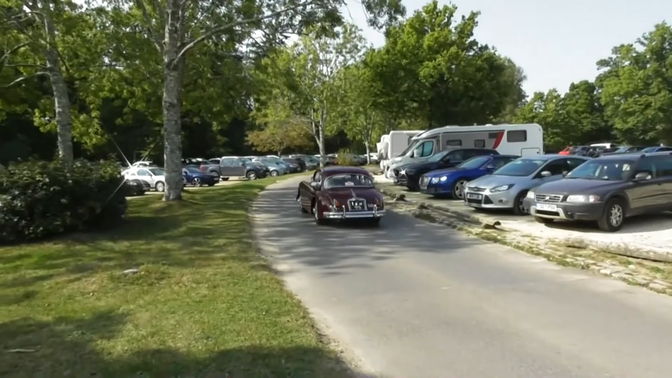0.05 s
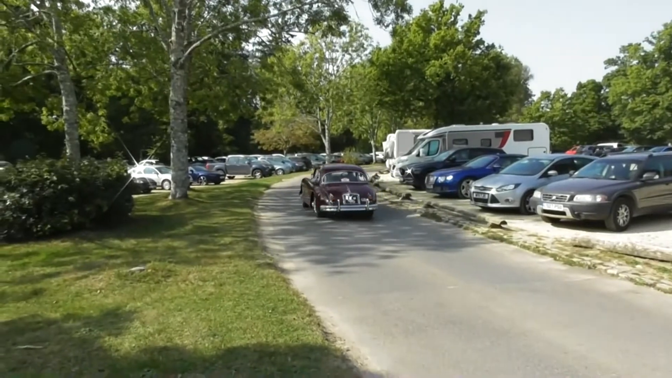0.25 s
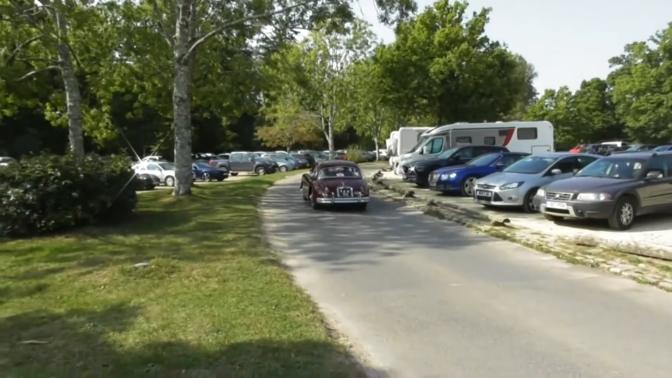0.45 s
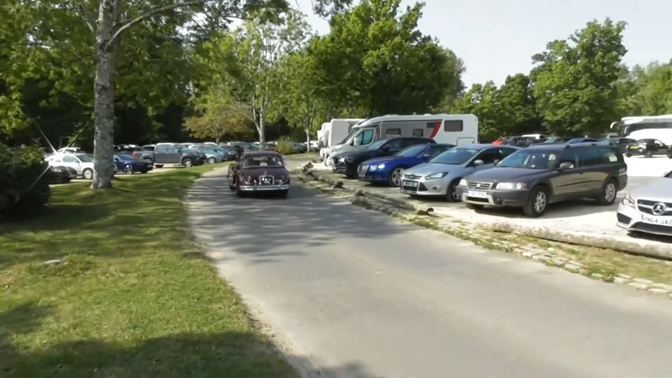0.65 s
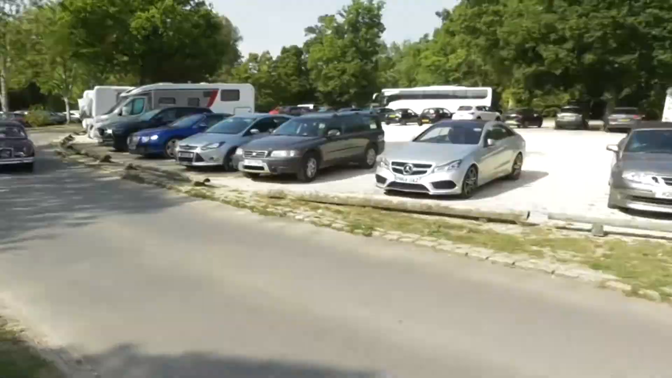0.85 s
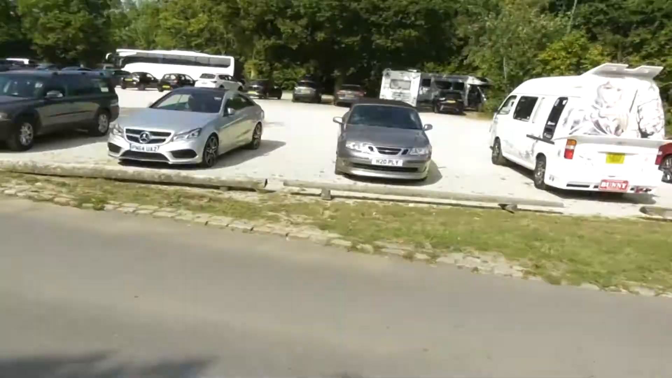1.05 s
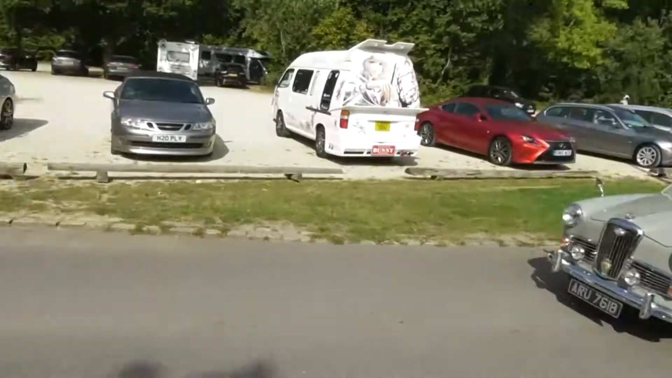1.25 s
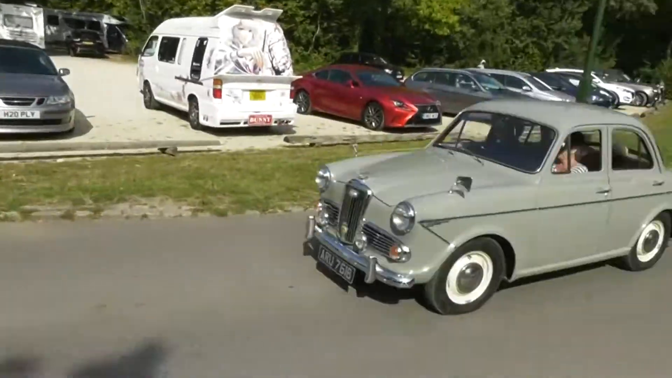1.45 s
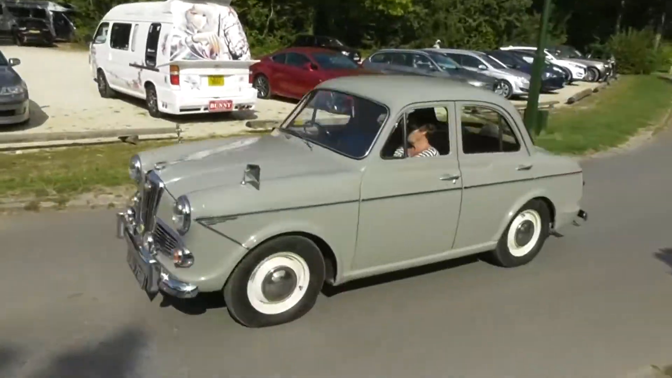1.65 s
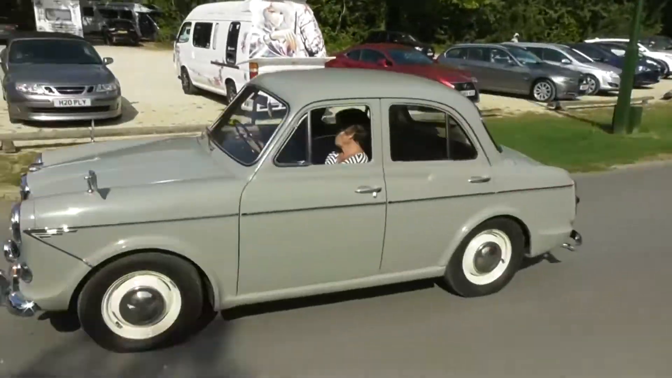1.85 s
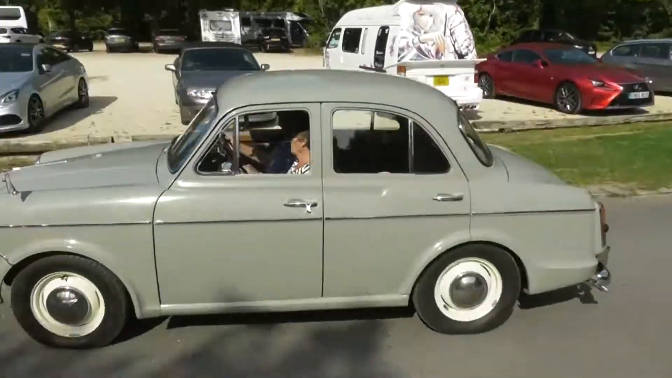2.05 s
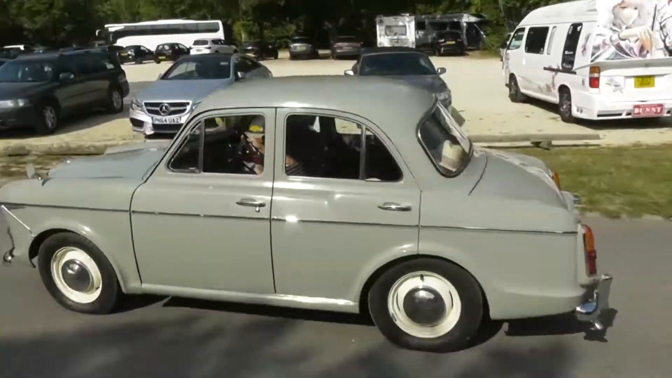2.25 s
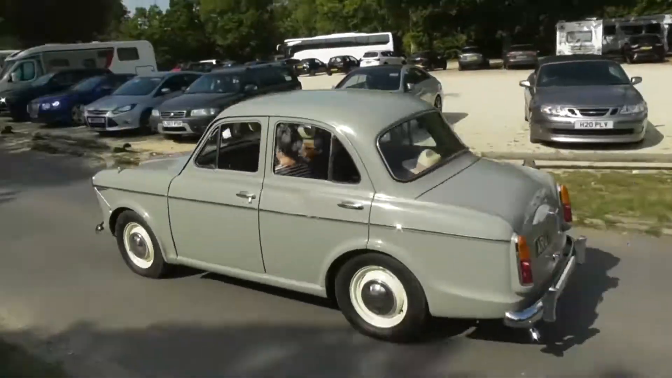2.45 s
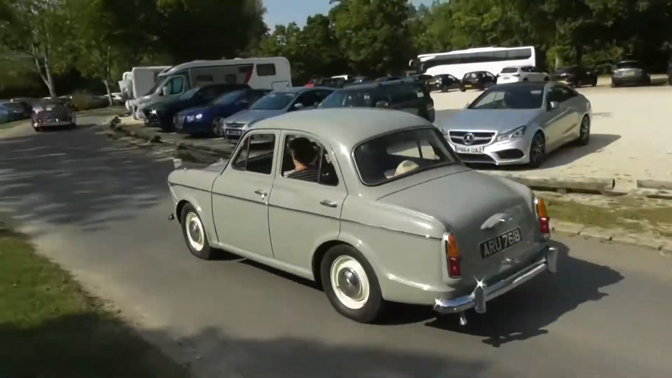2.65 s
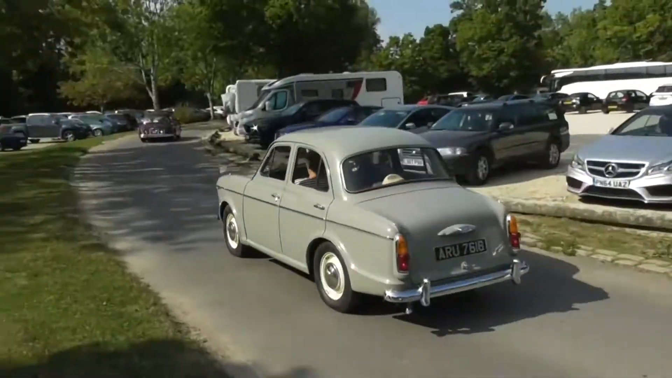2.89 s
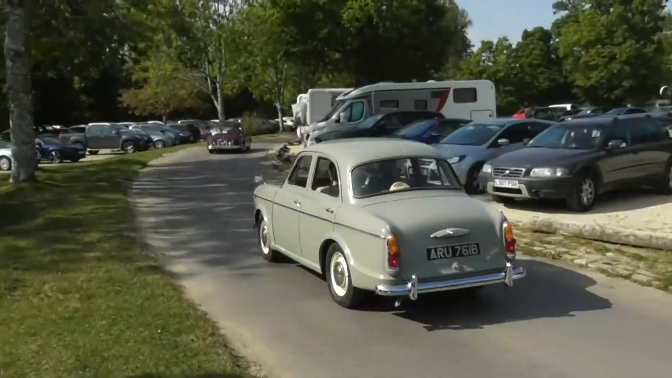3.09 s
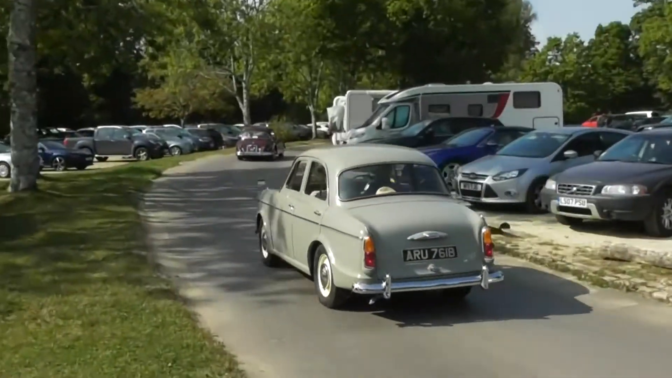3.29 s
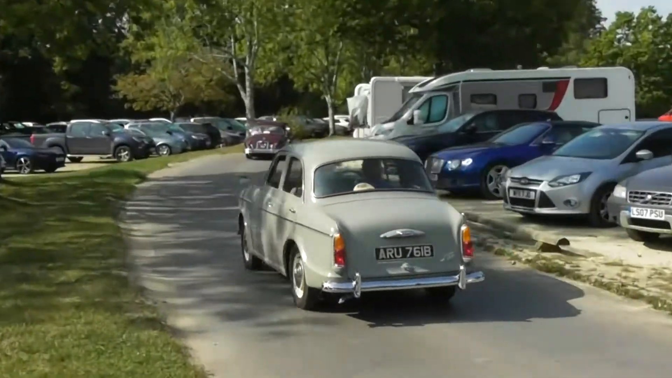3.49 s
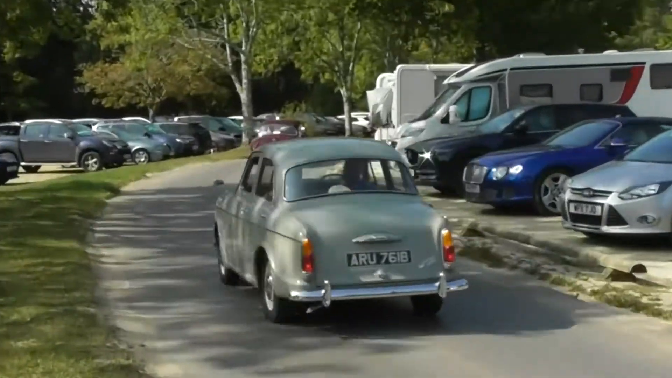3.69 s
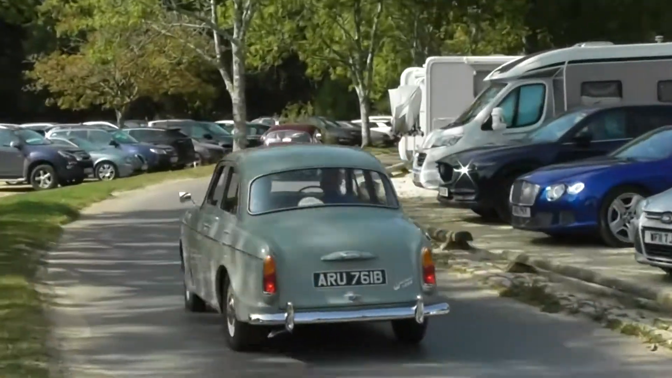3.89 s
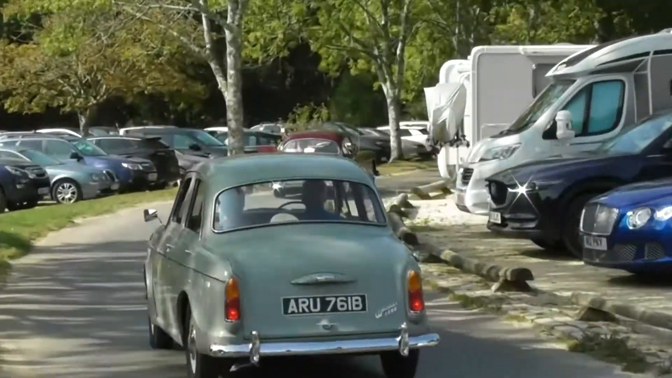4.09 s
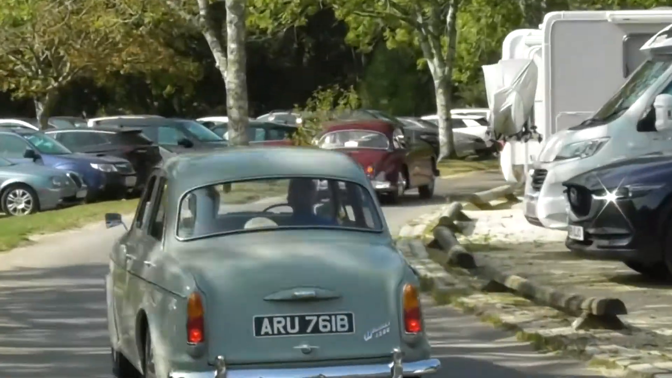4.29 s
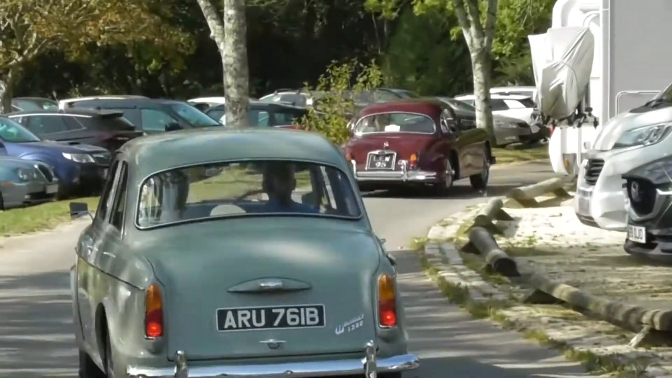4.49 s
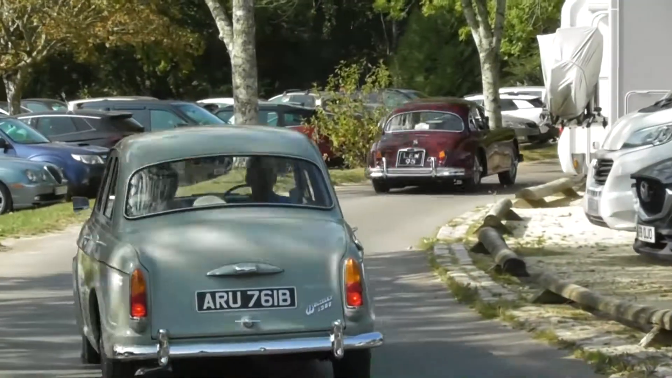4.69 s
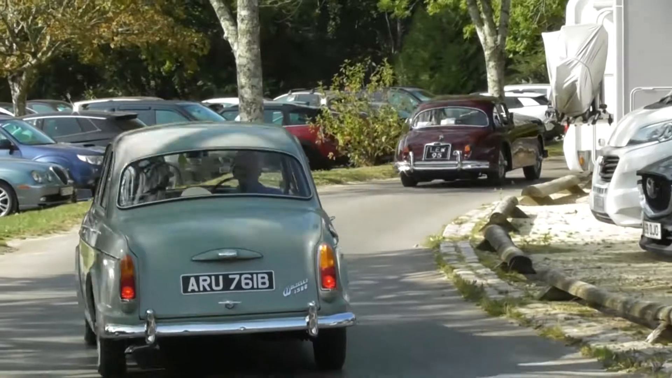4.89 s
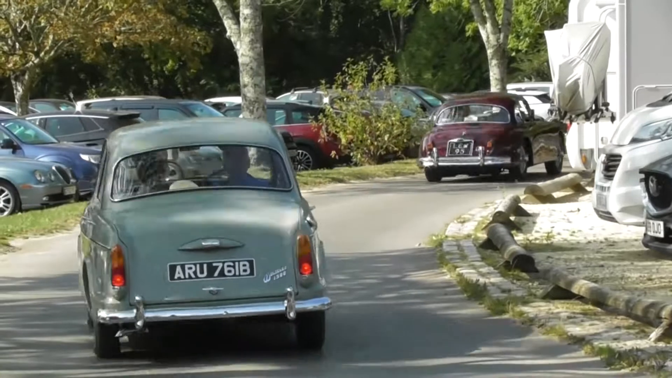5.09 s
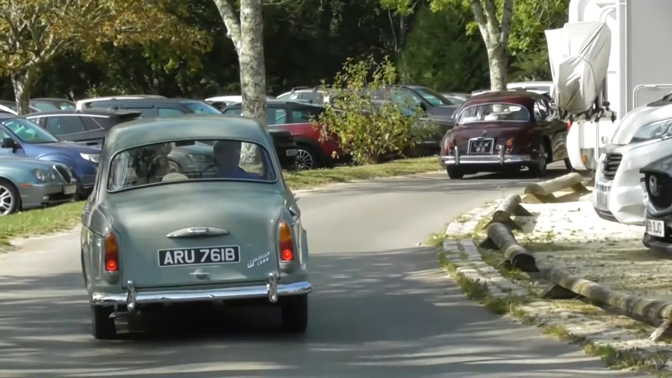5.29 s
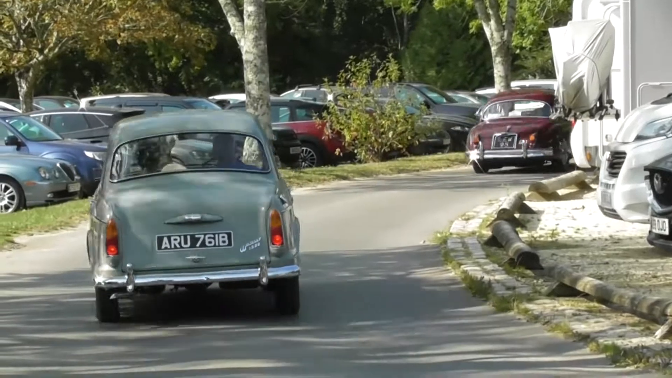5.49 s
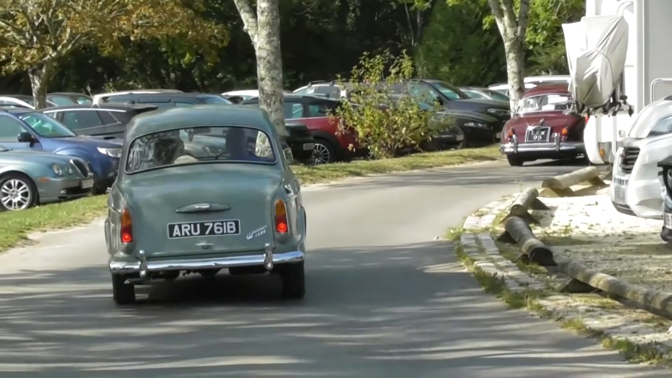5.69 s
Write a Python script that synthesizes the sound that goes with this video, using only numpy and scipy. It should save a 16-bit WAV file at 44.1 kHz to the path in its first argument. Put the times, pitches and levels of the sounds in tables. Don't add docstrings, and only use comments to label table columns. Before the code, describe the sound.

Low old-car engine hum swells into a close pass-by, rapid hissing exhaust puffs trail away, a pebble snaps, and a distant engine climbs in pitch.

```python
import sys
import numpy as np
from scipy import signal
from scipy.fft import rfft, irfft
from scipy.io import wavfile

SR = 44100
rng = np.random.default_rng(int(sys.argv[2]) if len(sys.argv) > 2 else 0)


def convert_level_to_amplitude(level_db):
    exponent = np.asarray(level_db, float) / 20
    return 10 ** exponent


def int16_out(signal):
    q = np.round(np.clip(np.atleast_2d(signal).T, -1, 1) * 32767)
    wavfile.write(sys.argv[1], SR, q.astype(np.int16))


N = 253134

# (time [s], firing rate [1/s])
RISING_RATE = [(0, 30.155), (0.4, 29.846), (0.8, 30.176), (1.1, 30.486), (1.4, 31.371), (1.7, 32.039),
               (2, 33.058), (2.3, 33.452), (2.6, 33.742), (2.9, 34.574), (3.3, 34.763), (3.8, 34.981),
               (4.4, 35.084), (5, 34.883), (5.74, 35.153)]
# (time [s], level [dB])
RISING_LEVEL = [(0, -27), (.3, -29), (.6, -33), (1.0, -36.5), (1.4, -36), (1.7, -38), (1.95, -31.5),
                (2.2, -28), (2.45, -32.5), (2.7, -33.5), (3.0, -37.5), (3.4, -40), (3.8, -38), (4.2, -43),
                (4.6, -41), (5.0, -42), (5.4, -45.5), (5.74, -65)]
# (multiple of firing rate [1], level [dB], share of the shade [0-1])
RISING_ORDERS = [(2, -18.5, 0.1), (4, 0.7, 0.98), (5, -7.5, 0.0), (6, -11, 1), (7, -31.5, 0.0),
                 (8, -12.5, 0.3), (9, -13, 0.19), (10, -22.5, 0.24)]
# (time [s], firing rate [1/s])
PASSING_RATE = [(0.7, 33.404), (1.4, 33.364), (1.9, 33.139), (2.3, 33.011), (2.7, 32.553), (3.2, 32.447),
                (3.8, 32.236), (4.5, 32.245), (5.74, 32.106)]
# (time [s], level [dB], extra path from the tailpipe [m])
PASSING_LEVEL = [(0, -52, -0.17), (.6, -45, 0.47), (1.0, -47.5, 0.15), (1.2, -42.5, -0.033),
                 (1.6, -40, -0.54), (1.8, -37, 0.64), (2.0, -38, 0.21), (2.2, -43.5, -0.58),
                 (2.6, -35.5, 0.4), (3.0, -40, -0.2), (3.4, -42, 0.17), (4.2, -47.5, -0.1),
                 (4.6, -54, -0.27), (5.74, -51.5, 0.033)]
# (multiple of firing rate [1], level [dB], share of the shade [0-1])
PASSING_ORDERS = [(1, -17, 1.0), (2, -26, 1.0), (2.5, -15, 1.0), (3, -26, 1.0), (4, 1.5, 1.0),
                  (5, 0.5, 0.03), (6, -14, 0.0), (7, -17.5, 1.0), (9, -30.5, 1.0), (10, -19.5, 0.0)]
# (time [s], level against the closest point [dB])
NEARNESS = [(0, -9), (.55, -9), (.9, -5), (1.3, 0.24), (1.85, 0.4), (2.4, -1.4), (2.7, -3.5), (3.1, -5.5),
            (3.6, -8), (4.35, -11), (5.0, -10.5), (5.74, -12)]
# (frequency [Hz], width [Hz], level [dB])
IDLE_BANDS = [
    (41, 4.5, -54),
    (83, 1.6, -47.5),
]
# (frequency [Hz], level [dB per Hz])
SPIT_SPECTRUM = [(2060, -56.5), (3500, -16), (4570, -31), (5330, -2), (6490, -3), (7560, 2.5), (8260, 1),
                 (9620, -4), (10300, -4.5), (12600, -16), (15200, -18), (16000, -28)]
# (time [s], level above neighbours [dB])
ODD_SPITS = [(2.325, -12), (2.415, 1.5), (2.445, 1), (2.507, 0.5), (2.538, 3), (2.568, 0.5), (2.691, 0.5),
             (2.998, 3), (3.122, 2), (3.153, 1.5), (3.276, 2), (3.4, 3), (3.49, 1.5), (2.599, -1),
             (2.66, 5), (2.752, -2), (2.814, 2.5), (2.875, -5.5), (3.029, 3.5), (3.183, -3), (3.245, -3.5),
             (3.523, 4.5), (3.585, 2), (3.895, 3), (4.112, 4), (5.012, 4), (5.074, 3), (5.26, 2),
             (5.385, 2.5), (5.665, 2)]
# (frequency [Hz], level [dB per Hz])
WHINE_SPECTRUM = [(7300, 0), (7750, 0)]
# (frequency [Hz], level [dB per Hz])
RUMBLE_SPECTRUM = [(12, -51), (20, -25), (87, -7), (146, -1.5), (169, -1), (240, -10), (290, -12.5),
                   (375, -21.5), (576, -14.5), (900, -30.5), (1170, -48), (1980, -120)]
# (frequency [Hz], level [dB per Hz])
BOOM_SPECTRUM = [(300, 0.74), (430, -2.7)]
# (frequency [Hz], level [dB per Hz])
ROAR_SPECTRUM = [(410, -15), (700, 1.5), (775, -7.5), (919, -2), (1040, -5.5), (1440, -6.5), (1800, -6.5),
                 (2150, -10), (2800, -11.5), (3560, -17.5), (4300, -20.5), (5000, -23), (5850, -63)]
# (frequency [Hz], level [dB per Hz])
HISS_SPECTRUM = [(1760, 16), (3000, 8), (3620, -4), (5040, -24), (5560, -4), (6350, 5), (7560, -1),
                 (11000, -8.5), (15000, -6.5), (16000, -27)]
# (time [s], firing rate [1/s], level [dB])
REVVING = [(4.0, 43, -75), (4.2, 51, -60), (4.4, 56, -58.5), (4.6, 64, -50), (4.85, 68, -59),
           (5.1, 76, -49), (5.3, 81, -50.5), (5.5, 92, -45), (5.74, 94, -52)]
# (multiple of firing rate [1], level [dB], share of the swell [1])
REVVING_ORDERS = [(1, 1.5, -0.19), (2, -14, 1.0), (3, -2.5, 0.0)]
# (time [s], peak level [dB])
PEBBLE_CRACKS = [
    (4.3843, -30),
    (4.3857, -50),
    (4.3862, -21.5),
    (4.3869, -20),
    (4.3881, -26.5),
]
# (frequency [Hz], level [dB], decay by 60 dB [s])
PEBBLE_MODES = [(905, 0.5, 0.021), (1270, -7.5, 0.018), (2320, 5, 0.0066), (4600, 5, 0.0024),
                (5570, 9, 0.0011), (8300, -4, 0.0043)]
# (frequency [Hz], side minus mid [dB])
SPREAD = [(28, -9), (60, -19), (99, -14), (160, -18.5), (270, -12.5), (450, -10), (740, -14), (1220, -10),
          (2010, -13.5), (3330, -22), (5500, -39), (9080, -7), (15000, -2)]
# (frequency [Hz], left minus right [dB])
LEAN = [(60, -2.0), (150, -2.0), (380, -2.0), (950, -1.0), (2380, -1.0), (5980, 0.0), (8500, -1.2),
        (13000, 0.3)]
# (frequency [Hz], lead of the left [rad])
PORT_LEAD = [(60, -0.071), (300, 0.13), (690, 0.41), (2500, 0.31), (6000, 0.065), (9400, -0.21),
             (10600, 0.42), (16000, .05)]

# (frequency [Hz], half width [Hz])
RISING_SILENCER, REVVING_SILENCER, NO_SILENCER = (278, 10.2), (229, 11), (SR, 1)
# (time [s], half length [s], level [dB])
RISING_SHADE = (0.23, 0.58, -14)
PASSING_SHADE = (1.81, 0.15, -36)
REVVING_SWELL = (4.36, 0.24, 29)

TAIL_SWING_S, TAIL_SWING_LENGTH_S = 2.2, 0.23
# (level when closest [dB], dB per dB of nearness [1], gain once the tail shows [dB])
SPIT_LAW, AFTER_HISS_LAW, WHINE_LAW = (-46, 1.827, 10.1), (-52.5, 1.43, 2.9), (-62, 2.6, -6)
RUMBLE_LAW, BOOM_LAW = (-43, 0.72, 1.17), (-48, 0.49, -16)
ROAR_LAW, HISS_LAW = (-42.5, 1.0, 0.083), (-48, 1, -0.73)
LEAK_BEHIND_S = 0.073
TREBLE_BEHIND_S = 0.21
BODY_BEHIND_S = 0.21
JET_RISE_POWER, JET_DECAY_S, JET_LATE_S = 2.99, 0.00086, 0.0006
CUTOFF_HZ = 16060


def rms_one(x):
    return x / np.sqrt(np.mean(x ** 2) + 1e-20)


def in_time(rows):
    s, *columns = np.transpose(rows)
    return [np.interp(np.arange(N) / SR, s, c) for c in columns]


def at_hz(points, hz):
    table_hz, level = np.transpose(points)
    return np.interp(np.log(hz), np.log(table_hz), level)


def drift(rate):
    r = np.exp(-80 * np.pi * rate / SR)
    slow = signal.lfilter([1], [1, -2 * r, r * r], rng.standard_normal(N // 40 + 2002))[2000:]
    return np.interp(np.arange(N) / 40, np.arange(len(slow)), rms_one(slow))


def leaning(hz):
    return convert_level_to_amplitude(at_hz(LEAN, hz) / 2 * np.array([[1], [-1]]))


def banded_noise(spectrum, per_octave, flicker):
    low_hz, high_hz = spectrum[0][0], min(spectrum[-1][0], 0.45 * SR)
    edges = np.geomspace(low_hz, high_hz, int(per_octave * np.log2(high_hz / low_hz)) + 2)
    white = rng.standard_normal((2, 2, N))
    out = 0
    for k, (low, high) in enumerate(zip(edges, edges[1:])):
        if at_hz(spectrum, low) < -55:
            continue
        band = signal.butter(2, [low, high], "band", fs=SR, output="sos")
        mid, side = signal.sosfilt(band, white[k % 2])
        hz = np.sqrt(low * high)
        pair = mid + convert_level_to_amplitude(at_hz(SPREAD, hz) - 1.5) * side * [[1], [-1]]
        out = out + convert_level_to_amplitude(at_hz(spectrum, hz) + flicker()) * leaning(hz) * pair
    return rms_one(out)


def below_treble(x):
    return signal.sosfilt(signal.butter(2, 9500, fs=SR, output="sos"), x)


def dulled(x, level_db, top_db, slope):
    low = below_treble(x)
    return low + (x - low) * convert_level_to_amplitude(slope * (level_db - top_db))


def by_nearness(law, behind_s=0):
    closest_db, follows, tail_db = law
    t = np.arange(N) / SR
    tail = 0.5 + 0.5 * np.tanh((t - TAIL_SWING_S) / TAIL_SWING_LENGTH_S)
    near_db = np.interp(t - behind_s * (1 - tail), *np.transpose(NEARNESS))
    return closest_db + follows * near_db + tail_db * tail


def firings(rate_table, start):
    return start + np.cumsum(in_time(rate_table)[0]) / SR


def exhaust_note(count, level_db, orders, shade, silencer, lead, lag, rough_db):
    out = np.zeros(N)
    rate = np.gradient(count) * SR
    shade_s, shade_length_s, shade_depth_db = shade
    silencer_hz, half_width_hz = silencer
    shade_db = shade_depth_db * np.exp(-((np.arange(N) / SR - shade_s) / shade_length_s) ** 2)
    for order, db, share in orders:
        angle = 2 * np.pi * order * count + lead - lag * order + 0.077 * drift(4.2)
        detuned = (order * rate - silencer_hz) / half_width_hz * (order * rate.max() > silencer_hz)
        gain_db = level_db + db + share * shade_db + rough_db * drift(5.6)
        out += np.sqrt(2) * convert_level_to_amplitude(gain_db) / np.sqrt(1 + detuned ** 2) * np.cos(angle)
    return out * leaning(140)


def rising_engine():
    count = firings(RISING_RATE, 0.004)
    level_db = in_time(RISING_LEVEL)[0]
    return exhaust_note(count, level_db, RISING_ORDERS, RISING_SHADE, RISING_SILENCER,
                        lead=4.5, lag=1.25, rough_db=0.6)


def passing_engine(count):
    level_db, extra_m = in_time(PASSING_LEVEL)
    at_tailpipe = count - 33 * extra_m / 343
    return exhaust_note(at_tailpipe, level_db, PASSING_ORDERS, PASSING_SHADE, NO_SILENCER,
                        lead=0.9, lag=0, rough_db=0.7)


def idler():
    out = np.zeros(N)
    for hz, width, db in IDLE_BANDS:
        r = np.exp(-np.pi * width / SR)
        resonance = [1, -2 * r * np.cos(2 * np.pi * hz / SR), r * r]
        hum = signal.lfilter([1, 0, -1], resonance, rng.standard_normal(N))
        out += convert_level_to_amplitude(db) * rms_one(hum)
    return out * leaning(80)


def leak(count):
    spit_db = by_nearness(SPIT_LAW, LEAK_BEHIND_S)
    hiss_db = by_nearness(AFTER_HISS_LAW, LEAK_BEHIND_S)
    which = np.floor(count).astype(int) - int(np.floor(count[0]))
    since_s = (count % 1) / 32.5
    late, strength, pitch = rng.standard_normal((200, 3)).T
    strength_db = 1.6 * strength
    odd = [which[round(s * SR)] for s, db in ODD_SPITS]
    strength_db[odd] = 1.3 * np.array(ODD_SPITS)[:, 1]
    spit_strength_db = strength_db[which]

    jet_s = np.maximum(since_s - JET_LATE_S * np.abs(late[which]), 0)
    puff = jet_s ** JET_RISE_POWER * np.exp(-jet_s / JET_DECAY_S)
    linger = signal.lfilter([0.004], [1, -0.9965], puff)
    burst = rms_one(puff) * convert_level_to_amplitude(spit_strength_db)
    jet = rms_one(puff + 0.8 * linger) * convert_level_to_amplitude(spit_strength_db)
    trail = (1 - np.exp(-since_s / 0.0048)) * np.exp(-since_s / 0.029)
    in_view = np.clip((np.arange(N) / SR - 0.6) / 2.6, 0.05, 1)

    air = banded_noise(SPIT_SPECTRUM, 6, lambda: 1.84 * np.clip(rng.standard_normal(200), -1.6, 1.6)[which])
    whistle = np.sin(2 * np.pi * np.cumsum(8200 + 520 * pitch[which]) / SR)
    whistle += 0.19 * np.sin(2 * np.pi * np.cumsum(5450 + 250 * late[which]) / SR)
    rush = jet * dulled(air, 0, top_db=-3.0, slope=0.74) * convert_level_to_amplitude(0.18 * spit_strength_db - 1.5)
    jets = convert_level_to_amplitude(spit_db - 8.5) * in_view * (rush + 1.53 * burst * whistle * leaning(6800))

    whine = banded_noise(WHINE_SPECTRUM, 1, lambda: 1.7 * drift(5.5)) * (1 - in_view)
    treble_db = by_nearness(AFTER_HISS_LAW, TREBLE_BEHIND_S)
    after_hiss = trail * dulled(air, treble_db, top_db=-49.5, slope=0.91)
    return convert_level_to_amplitude(by_nearness(WHINE_LAW)) * whine + jets + convert_level_to_amplitude(hiss_db + 7.5) * after_hiss


def road():
    rumble = banded_noise(RUMBLE_SPECTRUM, 3, lambda: drift(1.8))
    boom = banded_noise(BOOM_SPECTRUM, 3, lambda: drift(6.4))
    roar = banded_noise(ROAR_SPECTRUM, 4, lambda: 1.4 * drift(28))
    hiss = banded_noise(HISS_SPECTRUM, 3, lambda: drift(4.4))
    hiss = dulled(hiss, by_nearness(HISS_LAW, TREBLE_BEHIND_S), top_db=-55.5, slope=0.7)
    out = convert_level_to_amplitude(by_nearness(RUMBLE_LAW, BODY_BEHIND_S) + 7) * rumble
    out = out + convert_level_to_amplitude(by_nearness(BOOM_LAW) - 3.5) * boom
    out = out + convert_level_to_amplitude(by_nearness(ROAR_LAW)) * roar
    return out + convert_level_to_amplitude(by_nearness(HISS_LAW) - 8) * hiss


def revving_engine():
    level_db = in_time(REVVING)[1]
    return exhaust_note(firings(REVVING, 0), level_db, REVVING_ORDERS, REVVING_SWELL, REVVING_SILENCER,
                        lead=0, lag=0, rough_db=2.2)


def pebble():
    clicks, ring = np.full(N, 1e-18), np.zeros(N)
    clicks[[round(s * SR) for s, db in PEBBLE_CRACKS]] = convert_level_to_amplitude(np.array(PEBBLE_CRACKS)[:, 1] - 8)
    for hz, db, t60 in PEBBLE_MODES:
        r, w = convert_level_to_amplitude(-60 / (t60 * SR)), 2 * np.pi * hz / SR
        ring += signal.lfilter([0, convert_level_to_amplitude(db - 4.5) * np.sin(w)], [1, -2 * r * np.cos(w), r * r], clicks)
    spray = signal.lfilter([1], [1, -0.97], clicks) * rng.standard_normal(N)
    grit_band = signal.butter(4, [3600, 9000], "band", fs=SR, output="sos")
    return below_treble(ring) + signal.sosfilt(grit_band, 1.16 * spray + 2.2 * clicks)


def scene():
    passing = firings(PASSING_RATE, -0.287)
    spits = passing + 0.2625
    engines = rising_engine() + passing_engine(passing) + idler()
    return engines + leak(spits) + road() + revving_engine() + pebble()


def band_limit(x):
    return signal.sosfilt(signal.butter(12, 16480, fs=SR, output="sos"), x)


def record(dry):
    hz = np.maximum(np.fft.rfftfreq(N, 1 / SR), 1)
    half_lead = 0.5j * at_hz(PORT_LEAD, hz) * np.array([[1], [-1]])
    turned = irfft(rfft(dry) * np.exp(half_lead), N)
    top_cut = signal.cheby2(14, 60, CUTOFF_HZ + 90, fs=SR, output="sos")
    mix = signal.sosfilt(top_cut, turned)
    return band_limit(mix)


dry = scene()
out = record(dry)
int16_out(out)
```